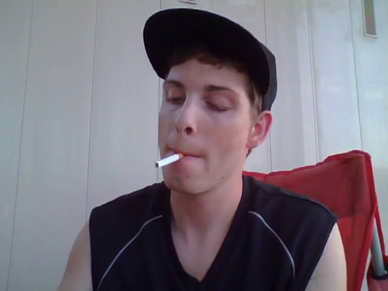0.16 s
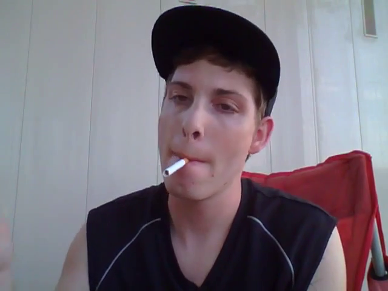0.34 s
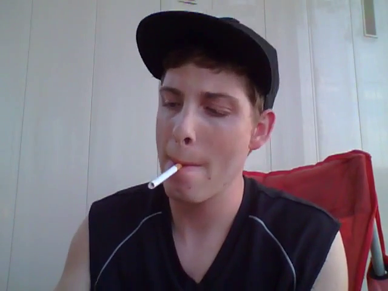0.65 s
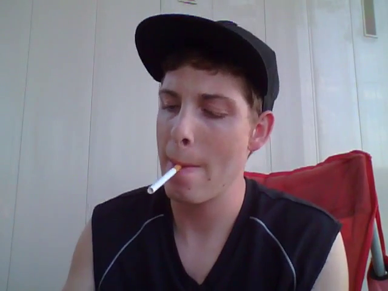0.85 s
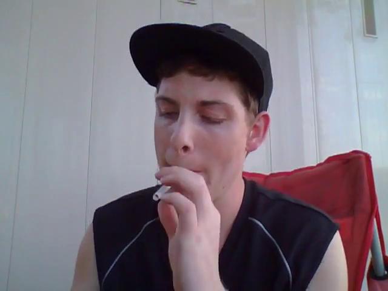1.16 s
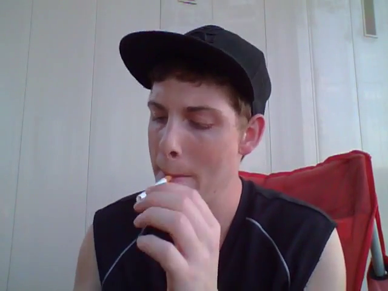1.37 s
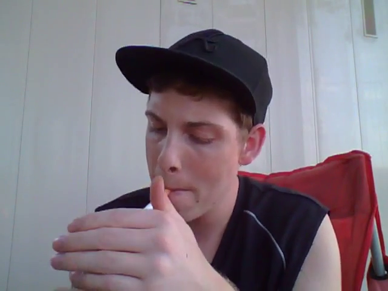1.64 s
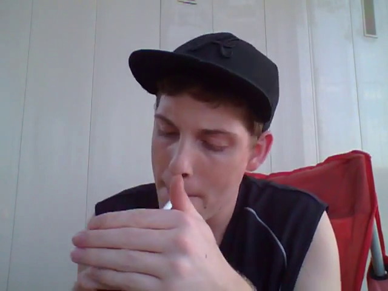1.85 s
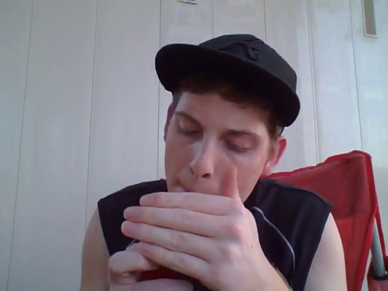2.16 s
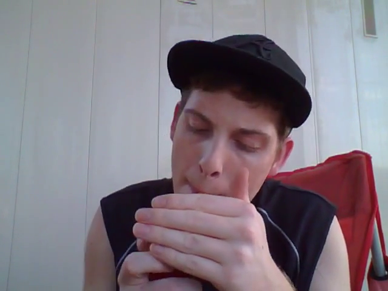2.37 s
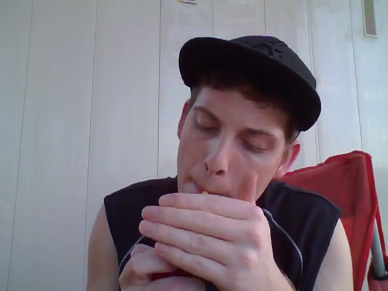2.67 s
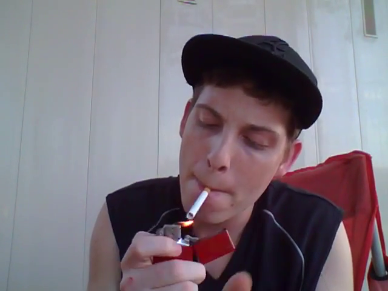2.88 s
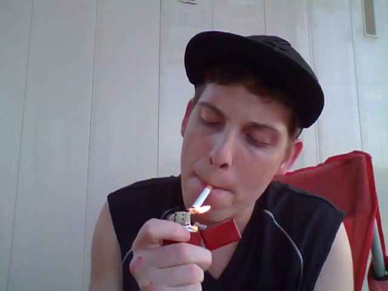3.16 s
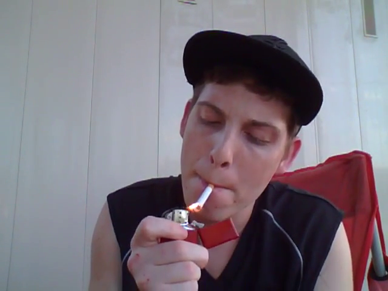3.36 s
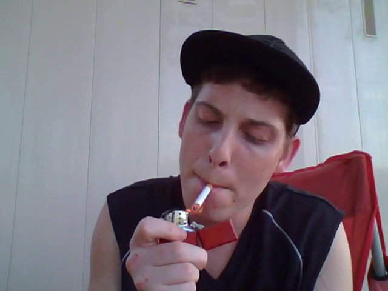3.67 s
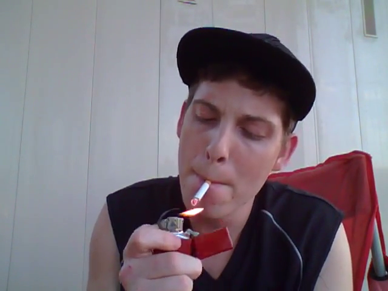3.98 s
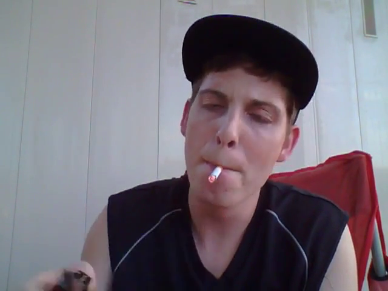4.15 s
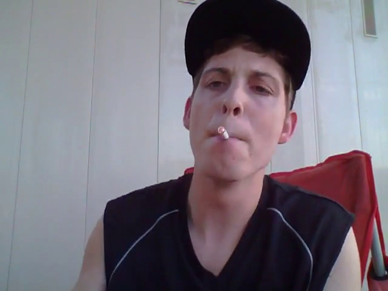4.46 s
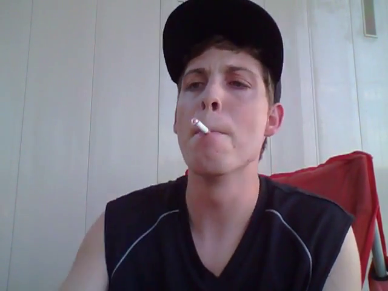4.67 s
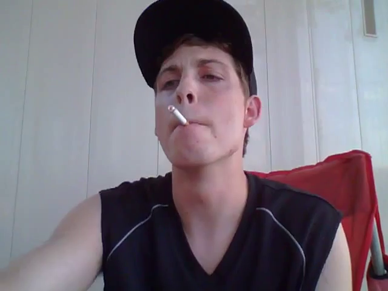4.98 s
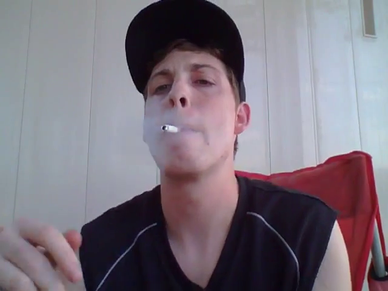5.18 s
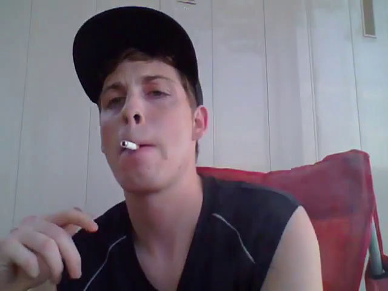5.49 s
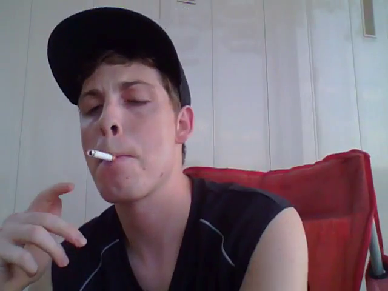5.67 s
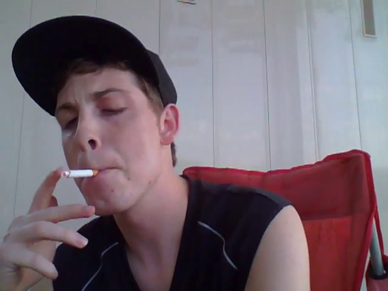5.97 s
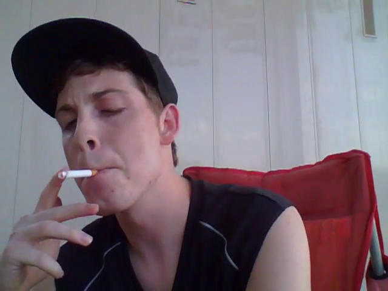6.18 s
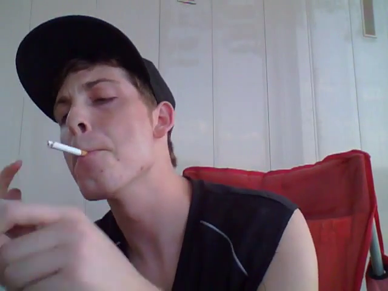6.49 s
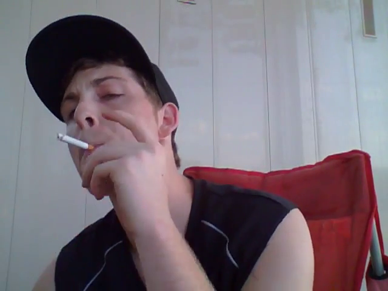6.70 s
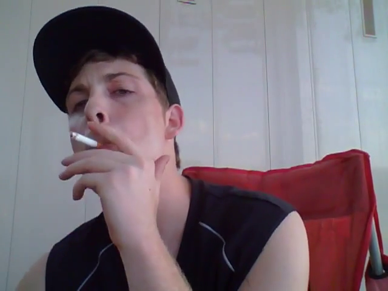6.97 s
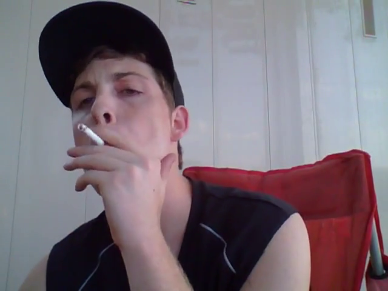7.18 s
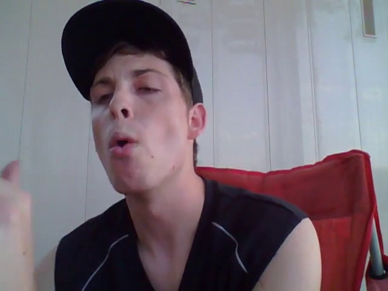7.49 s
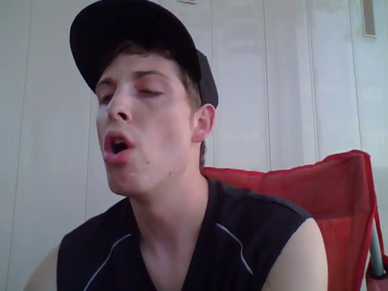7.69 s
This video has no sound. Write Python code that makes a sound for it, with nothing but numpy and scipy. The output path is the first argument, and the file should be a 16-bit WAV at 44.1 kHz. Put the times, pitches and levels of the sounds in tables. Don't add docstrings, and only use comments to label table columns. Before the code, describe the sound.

A quiet porch with steady soft hiss, low distant traffic, a very faint fan whine and a far songbird giving short gliding, slightly hoarse whistles from about 1.4 s onward. At 0.56 s a metal lighter lid springs open close by, a bright, sharp clink with a tiny rebound. At 2.1 s the flint wheel gives a short dry rasp; at 2.63 s a second, sharper scratch comes with a dull bump and faint flame flutter. Small hand bumps and cloth rustle gather from 4.1 s, then the lid snaps shut at 4.41 s, loud and metallic. At 5.06 s the lighter lands on a wooden table, hard overloaded knocks bouncing quickly until 5.16 s. The background drops after these blows and creeps back. A barely audible scratch follows at 5.5 s; soft chair jolts from 7.1 to 7.8 s surround a dull tap at 7.43 s.

```python
import sys
import numpy as np
from scipy import signal
from scipy.fft import rfft, irfft
from scipy.io import wavfile
from scipy.ndimage import uniform_filter1d

SR = 44100
rng = np.random.default_rng(int(sys.argv[2]) if len(sys.argv) > 2 else 0)


def nominal_scale(level):
    x = np.asarray(level, float) / 20
    return 10 ** x


def unload_audio(sound):
    columns = np.transpose(np.atleast_2d(sound))
    steps = np.round(np.clip(columns, -1, 1) * 32767)
    wavfile.write(sys.argv[1], SR, steps.astype(np.int16))


N = 345655
TIME = np.arange(N) / SR

# (f/Hz, level/dB, time to die by 60 dB/s)
RIM_MODES = [(7450, -4, .012), (7970, -4, .01), (6950, -7, .014), (8500, 0, .012), (6300, -22, .04),
             (8650, -22, .04), (9250, -10, .012), (6660, -32, .06), (3000, -24, .006)]


def colour(x, points):
    hz, db = np.transpose(points)
    f = np.fft.rfftfreq(N, 1 / SR)
    gain = nominal_scale(np.interp(np.log(f + 1), np.log(hz), db))
    y = irfft(rfft(x) * gain, N)
    return y / y.std()


def noise(points):
    return colour(rng.standard_normal(N), points)


def narrow(low_hz, high_hz):
    band = signal.butter(2, [low_hz, high_hz], "band", fs=SR, output="sos")
    x = signal.sosfilt(band, rng.standard_normal(N))
    return x / x.std()


def high_pass(x, hz, order=2):
    return signal.sosfilt(signal.butter(order, hz, "high", fs=SR, output="sos"), x + 1e-18)


def low_pass(x, hz):
    return signal.lfilter(*signal.butter(2, hz, fs=SR), x)


def played(curve):
    return nominal_scale(np.interp(TIME, *np.transpose(curve), left=-200, right=-200))


def add(track, s, sound):
    i = round(s * SR)
    track[i:i + len(sound)] += sound[:N - i]


def ring(force, modes, flip=-1):
    out = 0
    for k, (hz, db, t60) in enumerate(modes):
        r = nominal_scale(-60 / (t60 * SR))
        w = 2 * np.pi * hz / SR
        sine = signal.lfilter([0, np.sin(w)], [1, -2 * r * np.cos(w), r * r], force + 1e-18)
        out = out + flip ** k * nominal_scale(db) * sine
    return out


def blows(contacts, modes, crack_db, crack_s, flip=-1):
    out, t = np.zeros(N), TIME[:SR // 5]
    click = 1. * (t == 0)
    for s, db, cut_hz in contacts:
        grit = nominal_scale(crack_db) * rng.standard_normal(len(t)) * nominal_scale(-60 * t / crack_s)
        knock = low_pass(ring(click, modes, flip) + grit, min(cut_hz, 19000))
        add(out, s, nominal_scale(db) * knock)
    return out


def echoes(x, t60, cut_hz):
    t = TIME[:SR // 2]
    tail = low_pass(rng.standard_normal(len(t)), cut_hz) * nominal_scale(-60 * t / t60)
    tail = tail * (t > .003)
    return signal.oaconvolve(x, tail / np.linalg.norm(tail))[:N]


def ports(x, leak, leak_hz):
    lag = 17
    late = np.concatenate([np.zeros(lag), x[:-lag]])
    return np.array([leak * low_pass(x + 1e-18, leak_hz) - late, x])


def outdoor_hiss():
    # (f/Hz, level/dB per Hz)
    hiss_spectrum = [(130, -13.5), (250, 3), (500, -2), (1000, -1.5), (2000, -7), (3500, -11.5),
                     (8000, -13.5), (12000, -26)]
    return nominal_scale(-55.5) * noise(hiss_spectrum)


def traffic():
    rumble = [(40, -26), (120, 6.5), (300, 1.5), (700, -1.5), (1200, -26)]
    far = np.array([noise(rumble) for side in "LR"])
    return nominal_scale(-60.5) * far * nominal_scale(np.array([[-3.0], [1.5]]))


def whistle():
    # (t/s, level/dB)
    draught = [(3.87, -66), (3.9, -71), (4.05, -71), (4.09, -90)]
    swelling = nominal_scale(2.5 * noise([(.5, 0), (4, 0), (12, -30), (100, -80)]))
    fan = nominal_scale(-69.0) * narrow(2030, 2110)
    far_birds = nominal_scale(-65.5) * swelling * narrow(2700, 3300)
    return played(draught) * narrow(9150, 9230) + fan + far_birds


def bird():
    syllables = {"dip": [(0, .85), (.008, 1), (.02, .98), (.032, .87), (.048, .96), (.07, 1)],
                 "note": [(0, .95), (.012, 1), (.062, .96)], "hook": [(0, 1), (.022, .86), (.07, .83)],
                 "arch": [(0, .92), (.03, 1), (.055, 1), (.07, .97)], "fall": [(0, 1), (.03, .9),
                 (.065, .85)], "slide": [(0, 1), (.012, .86), (.025, .76), (.04, .7)]}
    # (t/s, syllable, pitch f/Hz, level/dB)
    song = [(1.43, "fall", 3580, -58), (1.59, "note", 2350, -61), (2.6, "note", 3330, -55),
            (2.68, "note", 3300, -59.5), (2.755, "hook", 2906, -51), (2.84, "arch", 3090, -51.5),
            (3.34, "note", 2790, -55), (3.397, "slide", 3300, -48.5), (3.85, "dip", 3214, -48.5),
            (3.935, "dip", 2770, -46.5), (4.18, "note", 2770, -51.5), (4.34, "note", 2700, -47),
            (4.455, "note", 2720, -45), (4.67, "fall", 3410, -58.5), (5.0, "slide", 3230, -55),
            (5.555, "dip", 3135, -50.5), (5.635, "dip", 2780, -52), (6.19, "hook", 3800, -56),
            (6.38, "note", 2300, -67.5), (6.24, "note", 2796, -53.5), (6.297, "slide", 3030, -59.5),
            (6.72, "note", 3200, -53), (6.81, "slide", 3000, -51), (6.9, "arch", 3110, -50.5),
            (7.275, "hook", 3700, -54.5), (7.34, "note", 2530, -59.5), (7.41, "note", 2445, -57)]
    out = np.zeros(N)
    waver = noise([(20, -0.5), (150, 4.0), (400, -27.5), (2000, -69.5)])
    for s, name, hz, db in song:
        after, share = np.transpose(syllables[name])
        t = TIME[:round(after[-1] * SR)]
        swell = np.clip(np.sin(np.pi * (t / after[-1]) ** .7), 0, 1) ** .6
        hoarse = 1 + .012 * waver[round(s * SR):][:len(t)]
        pitch = hz * np.interp(t, after, share) * hoarse
        add(out, s, nominal_scale(db) * swell * np.sin(2 * np.pi * np.cumsum(pitch) / SR))
    return out + nominal_scale(-6) * echoes(out, t60=.45, cut_hz=6000)


def ducking():
    # (t/s, level it ducks to/dB)
    ducks = [
        (0.562, -3.5),
        (4.406, -8),
        (5.056, -12),
    ]
    recovery_db_s = 3.5
    gains = []
    for s, depth_db in ducks:
        climb = np.minimum(depth_db + recovery_db_s * (TIME - s), 0)
        gains.append(np.where(TIME > s, climb, 0))
    return nominal_scale(uniform_filter1d(np.min(gains, axis=0), size=400))


def bumps():
    # (t/s, peak level/dB, f/Hz)
    soft_bumps = [(0.731, -36.5, 465), (2.6365, -23, 650), (2.647, -29, 253), (2.977, -33.5, 266),
                  (3.454, -35.5, 203), (4.108, -33.5, 320), (4.129, -36, 283), (4.203, -31.5, 704),
                  (4.237, -41, 201), (4.257, -31.5, 243), (4.288, -44, 120), (4.347, -30, 265),
                  (4.38, -25, 280), (4.398, -31, 297)]
    # (t/s, peak level/dB)
    jolts = [
        (7.092, -45.5),
        (7.198, -50.5),
        (7.216, -39.5),
        (7.271, -53.5),
        (7.498, -44),
        (7.511, -40),
        (7.543, -42),
        (7.635, -47.5),
        (7.819, -45.5),
    ]
    chair_hz, cycles = 137.6, 3.0
    out = np.zeros(N)
    for s, db, hz in [*soft_bumps, *[(s, db, chair_hz) for s, db in jolts]]:
        phase = hz * TIME[:SR // 10]
        swell = np.sin(np.pi * np.clip(phase / cycles, 0, 1) ** 0.14) ** 2
        add(out, s, nominal_scale(db) * np.sin(2 * np.pi * phase) * swell)
    return out


def rustle():
    # (t/s, level/dB)
    rubbing = [(4.1, -67), (4.28, -55), (4.335, -63.5), (4.342, -41), (4.38, -40), (4.405, -40.5),
               (4.43, -63.5), (4.5, -82.5)]
    lumps = nominal_scale(2.0 * noise([(5, 4.5), (120, 3.5), (250, -34)]))
    cloth = noise([(60, -22.0), (150, 1.5), (500, 3.5), (1300, -10.0), (2500, -32.5), (6000, -41.5)])
    return played(rubbing) * lumps * cloth


def flame():
    # (t/s, level/dB)
    flare = [(2.62, -80), (2.66, -73), (2.8, -65.5), (2.95, -85)]
    return played(flare) * noise([(30, -25), (70, 5), (130, -1), (300, -27), (1000, -77)])


def finger_ticks():
    # (t/s, peak level/dB, contact cut-off f/Hz)
    taps = [
        (4.2035, -45, 1700),
        (4.2628, -35, 9900),
        (4.3395, -38.5, 1500),
        (7.4300, -32.5, 1495),
        (7.4335, -39, 1504),
    ]
    # (f/Hz, level/dB, time to die by 60 dB/s)
    tap_modes = [(563, 0.5, 0.0038), (1020, -5.5, 0.016), (1640, -1.5, 0.0088), (4480, 2.5, 0.011),
                 (8130, -2.5, 0.0033)]
    return high_pass(blows(taps, tap_modes, crack_db=-6.5, crack_s=.012), 360)


def handling():
    return high_pass(bumps(), 110, order=4) + rustle() + flame() + finger_ticks()


def stroke_gain():
    # (grip t/s, slip t/s, rasp level at the slip/dB, build-up/dB per s)
    strokes = [
        (2.067, 2.105, -29.5, 1150.),
        (2.115, 2.1158, -37, 4000.),
        (2.6280, 2.6375, -34, 450.),
        (2.6369, 2.6379, -20.5, 3000.),
        (2.64, 2.643, -41, 100.),
    ]
    slip_db_s, spin_db, spin_db_s = 5500., -20, 607
    db = np.full(N, -200.)
    for grip_s, slip_s, slip_db, build_db_s in strokes:
        after = TIME - slip_s
        fade = np.maximum(-slip_db_s * after, spin_db - spin_db_s * after)
        shape = np.where(after < 0, build_db_s * after, fade)
        db = np.where(TIME > grip_s, np.maximum(db, slip_db + shape), db)
    return nominal_scale(db)


def flint():
    # (f/Hz, level/dB, time to die by 60 dB/s)
    wheel_modes = [(830, -9.5, 0.003), (1860, 5.5, 0.0022), (3070, -0.5, 0.0093), (4200, -2.5, 0.0034),
                   (5100, -4, 0.0084), (6650, 4.5, 0.0042), (8500, 0.5, 0.0054), (9336, -5, 0.0067),
                   (11720, -7.5, .004), (14000, -13, .003)]
    sizes = nominal_scale(4.9 * np.minimum(rng.exponential(1, N), 3)) * rng.choice([-1, 1], N)
    grains = (rng.random(N) < 12000 / SR) * sizes
    scrape = colour(grains, [(300, -18), (1500, -11.5), (9000, 0.5), (15000, -16.5)])
    rasp = ring(grains, wheel_modes) + nominal_scale(-1.0) * scrape
    return stroke_gain() * rasp / rasp.std()


def lid_opening():
    # (t/s, peak level/dB, contact cut-off f/Hz)
    contacts = [
        (.5572, -31, 7000),
        (.5590, -32, 7000),
        (.5605, -45, 7000),
        (.5622, -7.5, 14000),
        (.5690, -25.5, 12020),
        (.6320, -40, 6000),
    ]
    # (f/Hz, level/dB, time to die by 60 dB/s)
    open_modes = [(2320, -10.5, 0.026), (3003, -5.5, 0.014), (5520, 2.5, 0.024), (5800, -5, 0.012),
                  (6340, -14, 0.007), (3300, -20, .04), (7430, -22, 0.06), (8400, -24, .06),
                  (8560, -24.5, 0.039), (8550, -10.5, 0.016), (9470, -15, 0.018), (10600, -23.5, 0.017),
                  (11620, -19, 0.022), (12800, -26.5, 0.025)]
    snap = high_pass(blows(contacts, open_modes, crack_db=-19.5, crack_s=0.006), 2100, order=4)
    return snap + nominal_scale(-17) * high_pass(echoes(snap, t60=.22, cut_hz=13000), 7000)


def lid_shutting():
    # (t/s, peak level/dB, contact cut-off f/Hz)
    rim_contacts = [
        (4.4072, -5, 14000),
        (4.4094, -15.5, 14000),
    ]
    # (t/s, peak level/dB, contact cut-off f/Hz)
    cam_contacts = [
        (4.3870, -34.5, 4000),
        (4.4099, -5, 10000),
    ]
    # (f/Hz, level/dB, time to die by 60 dB/s)
    case_modes = [(1060, -18.5, 0.015), (2250, -10, 0.01), (2880, -6, 0.018), (3300, -0.5, .007),
                  (3970, 5.5, 0.0023), (5850, -3, 0.0045), (6170, -14.5, .02), (9200, -4, 0.0033),
                  (11600, -5.5, 0.0087), (14240, -23, .005)]
    snap = blows(rim_contacts, RIM_MODES, crack_db=-21.5, crack_s=0.0091)
    snap = snap + blows(cam_contacts, case_modes, crack_db=-1.5, crack_s=0.0072)
    echo = high_pass(echoes(snap, t60=.3, cut_hz=10500), 5500)
    return high_pass(snap, 700) + nominal_scale(-27) * echo


def lid_settling():
    # (t/s, peak level/dB, contact cut-off f/Hz)
    shift = [
        (5.526, -62, 8540),
    ]
    return high_pass(blows(shift, RIM_MODES, crack_db=5.0, crack_s=0.42), 5000)


def lighter_metal():
    metal = high_pass(flint(), 300) + lid_settling()
    metal += nominal_scale(-25) * echoes(metal, t60=.25, cut_hz=14000)
    return metal + lid_opening() + lid_shutting()


def table_contacts():
    # (t/s, peak level/dB, contact cut-off f/Hz)
    bounces = [
        (5.0581, -1, 6960),
        (5.0610, -20.5, 9000),
        (5.0657, -14, 4200),
        (5.0849, -3, 7024),
        (5.1000, -8, 5000),
        (5.1060, -24.5, 11970),
        (5.1349, -18.5, 6000),
    ]
    contacts = [*bounces]
    for k in range(6):
        s = 5.114 + .0085 * (k + rng.uniform(-.3, .3))
        contacts.append((s, -31 - 1.5 * k, 6000))
    return contacts


def table_knocks():
    # (f/Hz, level/dB, time to die by 60 dB/s)
    knock_modes = [(232, -6, 0.066), (314.7, -0.5, 0.017), (383, -13, .09), (285, -12, .1),
                   (440, -6, 0.024), (514, -6.5, 0.02), (566.2, -4, .025), (650, -5.5, 0.024),
                   (820, -6.5, 0.023), (980, -9, 0.013), (1260, -5, 0.019), (1600, -7, 0.015),
                   (2050, -3, 0.01), (2458, -13.5, 0.012),
                   (3000, -15.5, .008), (3450, -17, 0.0092), (4840, -11, .01), (6000, -13, 0.0051),
                  (7240, -17.5, .015), (8210, -16.5, 0.027)]
    modes = knock_modes
    knocks = blows(table_contacts(), modes, crack_db=0.5, crack_s=0.0066, flip=0.95)
    table = -high_pass(knocks, 410)
    return low_pass(table + 1e-18, 9500)


def scene():
    outside = ports(outdoor_hiss() + bird() + whistle(), leak=1.45, leak_hz=840) + traffic()
    hands = ports(handling(), leak=1.3, leak_hz=761.6)
    metal = ports(lighter_metal(), leak=1.4, leak_hz=790)
    knocks = table_knocks()
    table = ports(knocks, leak=0.88, leak_hz=1096.6)
    shaken = nominal_scale(-15) * np.array([echoes(knocks, t60=.09, cut_hz=550) for side in "LR"])
    return ducking() * high_pass(outside, 140) + hands + metal + table + shaken


def roll_off(x):
    return signal.sosfilt(signal.butter(12, 15770, fs=SR, output="sos"), x)


def record(dry):
    return roll_off(np.clip(dry, -1, 1))


dry = scene()
out = record(dry)
unload_audio(out)
```